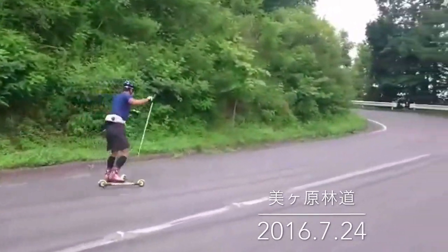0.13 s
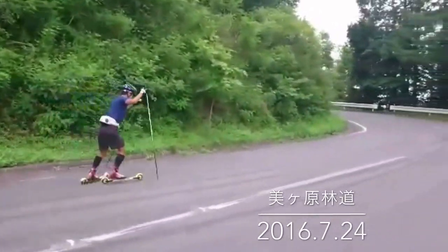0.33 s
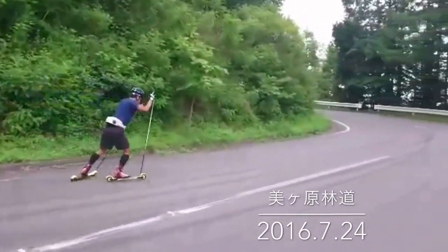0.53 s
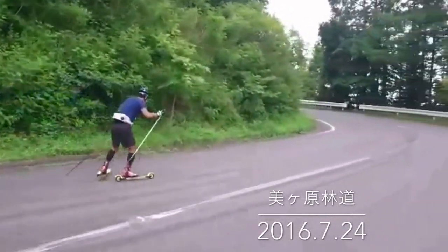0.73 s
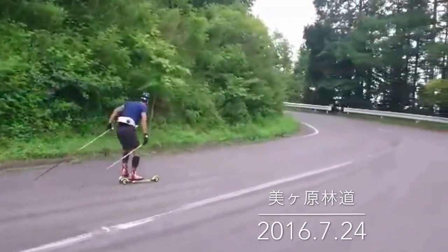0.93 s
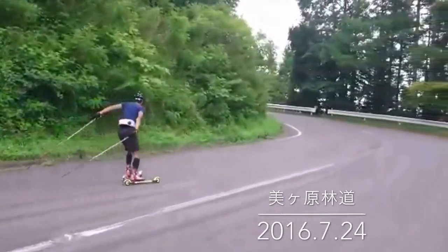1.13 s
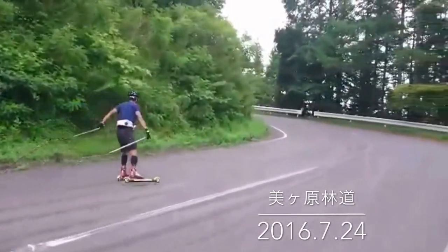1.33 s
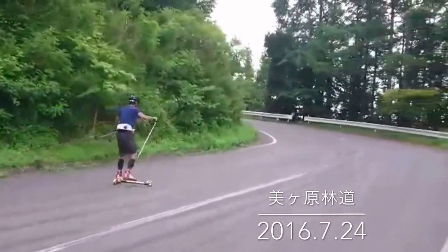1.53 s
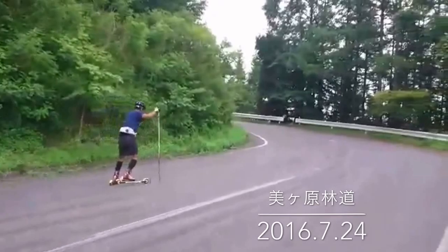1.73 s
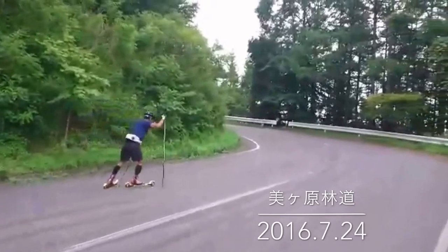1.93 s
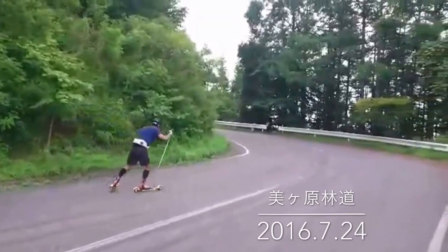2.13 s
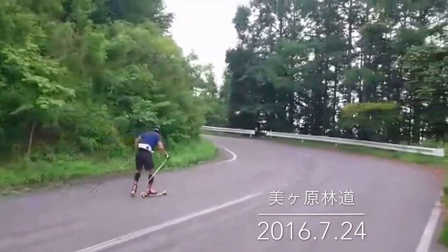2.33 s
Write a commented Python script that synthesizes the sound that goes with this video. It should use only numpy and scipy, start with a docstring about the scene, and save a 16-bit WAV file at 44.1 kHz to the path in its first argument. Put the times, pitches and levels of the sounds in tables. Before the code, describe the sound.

On an open forest road, a roller skier pushes along: brief gritty wheel scrapes alternate with sharp metallic pole strikes and rasps, over very faint rolling hiss, with slight wind thuds at the start and thin echo.

```python
"""Roller skier among trees

Rubber ski wheels skid over the tarmac at each push: banded noise roughened by random stone bursts.
Steel pole tips strike, bounce and rasp: noise cracks with damped sines. The frame knocks, wheels roll.
Decaying noise gives the thin echo of the trees; slow random swells of low noise give the breeze.
Two microphone ports hear it all, the skids in near opposite phase."""
import sys
import numpy as np
from scipy import signal
from scipy.fft import rfft, irfft, next_fast_len
from scipy.io import wavfile

SR = 44100
rng = np.random.default_rng(int(sys.argv[2]) if len(sys.argv) > 2 else 0)


def linear_from_db(decibels):
    """Turn decibels (scalar or array-like) into linear amplitude factors; 0 gives 1."""
    return 10 ** (np.asarray(decibels, float) / 20)


def master(y):
    """Save y as 16-bit WAV."""
    cut = np.clip(np.atleast_2d(y).T, -1, 1)
    pcm = np.round(cut * 32767)  # scale
    wavfile.write(sys.argv[1], SR, pcm.astype(np.int16))


N = 110250
T = np.arange(N) / SR
HZ = np.fft.rfftfreq(next_fast_len(N + 4096), 1 / SR)


def evened(x):
    """Normalisation: the mean of the channels gets rms 1."""
    return x / np.sqrt(np.mean(np.atleast_2d(x).mean(0) ** 2) + 1e-20)


def read(points, hz, axis=1):
    """Logarithmic frequency scale: interpolates one column of a table along it."""
    p = np.array(points, float)
    return np.interp(np.log(hz + 1), np.log(p[:, 0] + 1), p[:, axis])


def curve_gain(tables, axis):
    """Envelope: sums the gains of dB curves over time, inaudible outside each curve."""
    gains = []
    for table in tables:
        curve = np.array(table)
        gains.append(linear_from_db(np.interp(T, curve[:, 0], curve[:, axis], -200, -200)))
    return sum(gains)


def coloured(x, points):
    """Minimum-phase filtering: a causal response with the given magnitude spectrum."""
    level_db = read(points, abs(np.fft.fftfreq(4096, 1 / SR)))
    log_gain = np.log(linear_from_db(np.maximum(level_db, -90)))
    # the Hilbert transform of the log gain supplies the phase
    spectrum = np.exp(np.conj(signal.hilbert(log_gain)))
    taps = np.fft.ifft(spectrum).real[:2048]
    return signal.oaconvolve(x, taps[None], axes=1)[:, :N]


def band(x, lo_hz, hi_hz):
    """Band limiting by a third-order Butterworth design."""
    sos = signal.butter(3, [lo_hz, min(hi_hz, 20000)], "band", fs=SR, output="sos")
    return signal.sosfilt(sos, x)


def ports(pair, table):
    """Partial coherence: right hears the first sound, left its turned copy blended with the second."""
    first, second = rfft(pair, 2 * len(HZ) - 2)
    same = np.clip(read(table, HZ), 0, 1)
    turned = first * np.exp(1j * read(table, HZ, axis=3))
    blend = same * turned + np.sqrt(1 - same ** 2) * second
    left = linear_from_db(read(table, HZ, axis=2)) * blend
    return irfft(np.array([left, first]))[:, :N]


def grit(per_s, spread_db, smooth):
    """Random impact process: two views of the same stones, as bursts of random size over smooth hiss."""
    # the largest stone is 3.2 times the size spread
    size_db = spread_db * np.minimum(rng.exponential(1, N), 3.2)
    size = linear_from_db(size_db) * (rng.random(N) < per_s / SR)
    bursts = np.sqrt(abs(signal.lfilter([1], [1, -.96], size ** 2)))
    smooth = np.clip(smooth, 0, 1)
    roughness = smooth + (1 - smooth) * evened(bursts)
    return roughness * rng.standard_normal((2, N))


# Sideways drag of the wheels, one curve per skid: (time [s], level [dB], bass re level [dB])
SKIDS = [
    [(.202, -46.5, -20), (.22, -36, -9), (.25, -31.5, -13), (.269, -30, -17.5), (.2755, -38, -14)],
    [(.604, -42, -10), (.65, -44.5, -6), (.69, -49.5, -5.5), (.706, -60, -11)],
    [(.71, -68, -19.5), (.74, -56.5, -10.5), (.79, -60, -11.5), (.84, -71, -18)],
    [(1.107, -48, -19), (1.145, -44, -10.5), (1.154, -44, -3), (1.194, -45, -22), (1.2, -57, -2),
     (1.29, -66, -3.5)],
    [(1.69, -66, -30), (1.712, -66.5, -2.5), (1.734, -57.5, -16), (1.755, -88, -19)],
]
# Top treble re level, one per skid: (level [dB])
SKID_FIZZ = [-7.5, 0, 5.5, 2, 8]
# Spectrum of rubber on tarmac: (frequency [Hz], density [dB per Hz])
SKID_COLOUR = [(120, -38.5), (300, -9.5), (1300, -5), (2600, 5.5), (7000, -7.5), (11000, -16), (16000, -13)]
# Stones under the wheels: (rate [stones per s], size spread [dB], share of smooth hiss [0-1])
SKID_GRIT = (1700, 4.0, .4)
# Edges of bass, body and fizz: (frequency [Hz])
SKID_BANDS = (150, 1300, 8500, 18000)
# Skis at the ports: (frequency [Hz], likeness [0-1], left minus right [dB], left lead [rad])
SKI_PORTS = [(250, .97, -6, -3.0), (1200, .88, -4.5, -2.25), (2200, .93, 1, -2.9), (3500, .88, -4, -3.0),
             (6500, .6, -7.5, -2.2), (9000, .35, -.5, -2.6)]
# The same after the first push, when the skier has moved across; same columns
ACROSS_PORTS = [(hz, same, db, lead + 0.64 * min(hz / 2200, 1)) for hz, same, db, lead in SKI_PORTS]


def skids():
    """Sliding friction: rubber dragged sideways over coarse tarmac excites noise in three bands."""
    stones = coloured(grit(*SKID_GRIT), SKID_COLOUR)
    bass_curves = [[(s, db + low) for s, db, low in curve] for curve in SKIDS]
    bass = curve_gain(bass_curves, axis=1)
    body = curve_gain(SKIDS, axis=1)
    fizz = sum(linear_from_db(db) * curve_gain([curve], axis=1) for curve, db in zip(SKIDS, SKID_FIZZ))
    edges = list(zip(SKID_BANDS, SKID_BANDS[1:]))

    def heard(table):
        """Superposition: the three bands add at the ports."""
        x = ports(stones, table)
        return sum(gain * evened(band(x, *edge)) for gain, edge in zip((bass, body, fizz), edges))

    second_push_s = SKIDS[1][0][0]
    return np.where(T < second_push_s, heard(SKI_PORTS), heard(ACROSS_PORTS))


# Pole tip strikes and bounces: (time [s], level [dB], upper band re level [dB])
STRIKES = [(0.5086, -37.5, -19), (0.5312, -23.5, -30), (0.5683, -17.5, -11), (0.9712, -26.5, -2.5),
           (0.9864, -21, -6), (0.9928, -22.5, 6), (1.026, -24.5, 1), (1.0315, -22, 2.5),
           (1.0387, -19.5, -11), (1.0497, -20.5, -2), (1.0618, -17, -8), (1.0717, -19.5, -2.5),
           (1.256, -30, -24), (1.269, -35, -18), (1.6975, -49, 8), (2.0088, -39.5, -4), (2.0373, -34, -16),
           (2.0488, -28, 6.5), (2.0654, -24.5, 6.5), (2.0881, -42, 20)]
# Pole tip dragging between strikes, one curve per drag: (time [s], level [dB])
DRAGS = [
    [(.524, -67), (.55, -49.5), (.557, -71), (.567, -39), (.603, -51)],
    [(.96, -60), (.985, -50), (1.003, -36.5), (1.013, -46), (1.03, -38), (1.07, -42), (1.11, -43.5)],
    [(1.998, -74), (2.045, -58), (2.075, -43.5), (2.115, -57.5), (2.25, -69)],
]
# Stones under the tip: (rate [stones per s], size spread [dB], share of smooth hiss [0-1])
DRAG_GRIT = (1200, 2.8, .5)
# Spectrum of steel on stone: (frequency [Hz], density [dB per Hz])
POLE_COLOUR = [(300, -36), (1200, -12), (2300, -5.5), (5500, -2), (10000, -11.5), (16000, -18)]
# Shaft resonances before detuning: (frequency [Hz], level [dB])
POLE_MODES = [(2250, -12), (3650, -14), (5400, -12), (6400, -14.5)]
# Poles at the ports: (frequency [Hz], likeness [0-1], left minus right [dB], left lead [rad])
POLE_PORTS = [(1560, 1, -9.5, -2), (2300, 0.19, -5, -1.44), (3700, 0.71, -3, -0.81),
              (6700, 0.28, -4.5, -1.6)]


def poles():
    """Impact and modal decay: a crack, a crunch of grit and the shaft's short ring; the tip rasps too."""
    rise_s, crack_t60_s, crunch_t60_s, ring_t60_s = .0005, .006, .03, .03
    crunch_db, split_hz = -1, 4400
    t = T[:4000]
    lower, upper = np.zeros((2, 2, N + 4000))
    rise = 1 - np.exp(-(t / rise_s) ** 2)
    crack = linear_from_db(-60 * t / crack_t60_s)
    crunch = linear_from_db(crunch_db - 60 * t / crunch_t60_s)
    for s, level_db, upper_db in STRIKES:
        noise = rise * (crack + crunch) * rng.standard_normal((2, len(t)))
        burst = coloured(noise, POLE_COLOUR)[:, :len(t)]
        detune = rng.uniform(0.92, 1.06, (len(POLE_MODES), 2, 1))
        ring = sum(linear_from_db(db) * np.sin(2 * np.pi * hz * d * t) for (hz, db), d in zip(POLE_MODES, detune))
        hit = burst / abs(burst).max() + ring * rise * linear_from_db(-60 * t / ring_t60_s)
        at = round(s * SR)
        lower[:, at:at + len(t)] += linear_from_db(level_db) * hit
        upper[:, at:at + len(t)] += linear_from_db(level_db + upper_db) * hit
    struck = band(lower[:, :N], 110, split_hz) + band(upper[:, :N], split_hz, 20000)
    rasp = evened(ports(coloured(grit(*DRAG_GRIT), POLE_COLOUR), POLE_PORTS))
    return ports(struck, POLE_PORTS) + curve_gain(DRAGS, axis=1) * rasp


# Dull knocks of a ski frame settling on the road: (time [s], peak before the ports [dB])
KNOCKS = [(0.534, -46.5), (.567, -42), (1.248, -45), (1.714, -55.5), (2.049, -49)]


def knocks():
    """Damped low-frequency impact: decaying noise, its start softened by an octave either side of 307 Hz."""
    centre_hz, t60_s = 307, 0.072
    t, out = T[:4000], np.zeros((2, N + 4000))
    for s, peak_db in KNOCKS:
        noise = linear_from_db(-60 * t / t60_s) * rng.standard_normal((2, len(t)))
        puff = band(noise, centre_hz / 2, centre_hz * 2)
        at = round(s * SR)
        out[:, at:at + len(t)] += linear_from_db(peak_db) * puff / abs(puff).max()
    return ports(out[:, :N], SKI_PORTS)


# Decay time of the echo by band: (frequency [Hz], t60 [s])
ECHO_T60 = [(2000, 0.27), (14000, 0.66)]
DIFFUSE = 0.56  # share of likeness and balance left for scattered sound
# Scattered sound at the ports: (frequency [Hz], likeness [0-1], left minus right [dB], left lead [rad])
FAR_PORTS = [(hz, same * DIFFUSE, db * DIFFUSE, lead) for hz, same, db, lead in ACROSS_PORTS]


def trees(x):
    """Diffuse scattering from trunks and the bank: a noise tail, each band dying at its own speed."""
    start_s = 0.0071
    hz, t, z = signal.stft(rng.standard_normal((2, SR // 2)), SR, nperseg=256)
    decay = linear_from_db(-60 * t / read(ECHO_T60, hz)[:, None])
    tail = signal.istft(z * decay, SR, nperseg=256)[1]
    tail = np.pad(tail / np.linalg.norm(tail[0]), ((0, 0), (round(start_s * SR), 0)))
    # the right port's sound excites both tails
    return ports(signal.fftconvolve(x[1:], tail, axes=1)[:, :N], FAR_PORTS)


# Rolling wheels and forest hush: (time [s], level [dB])
ROLL = [(0, -64.5), (.45, -61.5), (.9, -65.5), (1.35, -64), (1.58, -70), (1.85, -63.5), (1.97, -69),
        (2.25, -66.5), (2.5, -71)]
# Spectrum of the rolling: (frequency [Hz], density [dB per Hz])
ROLL_COLOUR = [(120, -5), (600, -5.5), (3650, 0.5), (4200, -2.5), (7000, -5.5), (16000, -14)]
# Stones under the rolling wheels: (rate [stones per s], size spread [dB], share of smooth hiss [0-1])
ROLL_GRIT = (3000, 2.5, .7)


def rolling():
    """Rolling contact noise: wheels hiss on the road over the hush of the trees."""
    hiss = ports(coloured(grit(*ROLL_GRIT), ROLL_COLOUR), FAR_PORTS)
    return curve_gain([ROLL], axis=1) * evened(hiss)


# Breeze at the ports: (time [s], left level [dB], right level [dB])
WIND = [(0, -67, -61), (.09, -58.5, -72), (.25, -73.5, -74), (.36, -64, -75), (.42, -88, -78),
        (1.9, -82.5, -87), (2.0, -76, -69), (2.1, -90, -78), (2.5, -83, -88)]
# Spectrum of the breeze: (frequency [Hz], density [dB per Hz])
WIND_COLOUR = [(15, -20.5), (65, 3), (110, 3), (180, -6.5), (600, -51)]


def wind():
    """Turbulent pressure fluctuation: a lumpy low rumble, independent at the two ports."""
    gusts_per_s, lumpy_db = 22, 4.5  # random levels per second and their spread
    count = round(gusts_per_s * N / SR) + 2
    knots = np.arange(count) / gusts_per_s
    lumps = np.array([np.interp(T, knots, rng.standard_normal(count)) for _ in range(2)])
    rumble = evened(coloured(rng.standard_normal((2, N)), WIND_COLOUR))
    gains = [curve_gain([WIND], axis=1), curve_gain([WIND], axis=2)]
    return rumble * linear_from_db(lumpy_db * lumps) * gains


# Separate buffets of air: (time [s], envelope peak [dB])
BUFFETS = [(.047, -48), (.075, -40), (0.099, -38), (.158, -44.5), (.208, -47.5)]


def buffets():
    """Local pressure pulses: short low thuds of air, Gaussian-windowed tones at the left port alone."""
    width_s = 0.0067
    thuds = np.zeros(N)
    for s, peak_db in BUFFETS:
        hz = 99.3 * rng.uniform(.8, 1.1)
        tone = np.sin(2 * np.pi * (hz * T + rng.random()))
        thuds += linear_from_db(peak_db) * np.exp(-((T - s) / width_s) ** 2) * tone
    return np.array([thuds, np.zeros(N)])


def scene():
    """Linear superposition of skier, echo, road and breeze."""
    skier = skids() + poles() + knocks()
    echo = linear_from_db(-21.5) * trees(skier)
    return skier + echo + rolling() + wind() + buffets()


def band_limit(x):
    """A steep low-pass at the top of the band."""
    return signal.sosfilt(signal.butter(12, 16410, fs=SR, output="sos"), x)


# Microphone response: (frequency [Hz], gain [dB])
MIC_COLOUR = [(3800, 0), (4500, -4), (6500, 2.5), (7800, -3.5), (15400, -8.5), (16000, -40)]


def record(dry):
    """Transducer response: the microphone colours the sound, the converter adds a small offset."""
    offset = -.000354  # of full scale
    mix = coloured(dry, MIC_COLOUR) + offset
    return band_limit(mix)


dry = scene()
out = record(dry)
master(out)
```